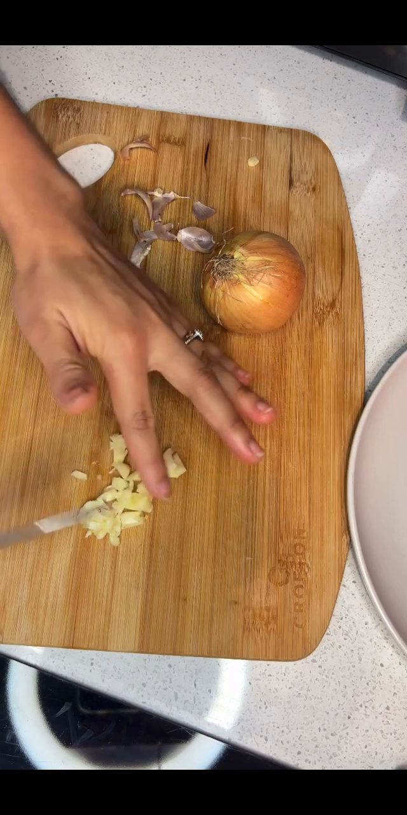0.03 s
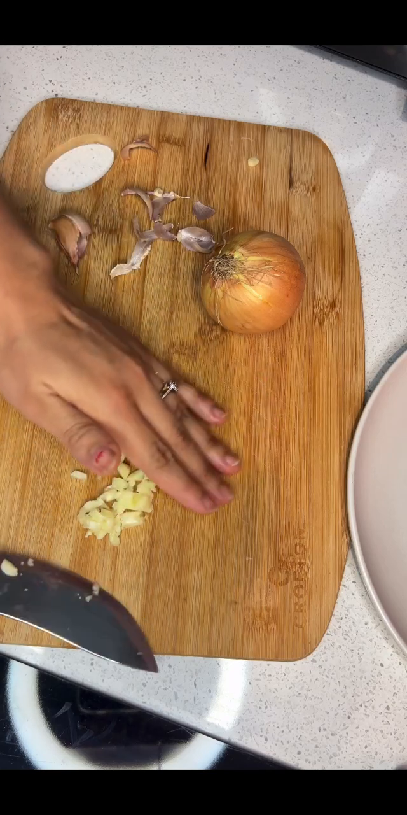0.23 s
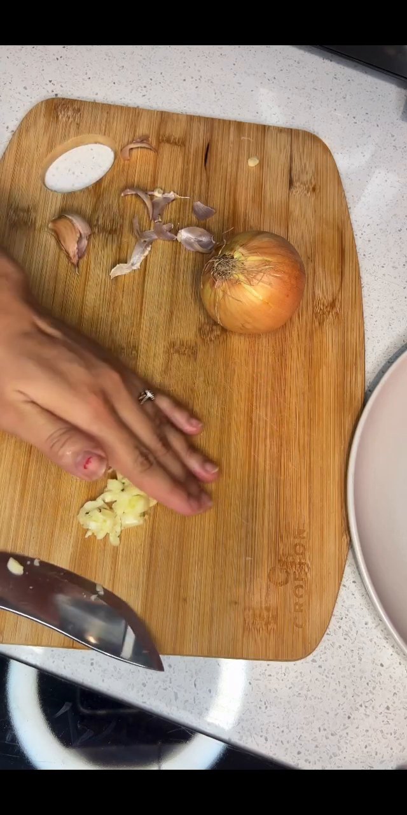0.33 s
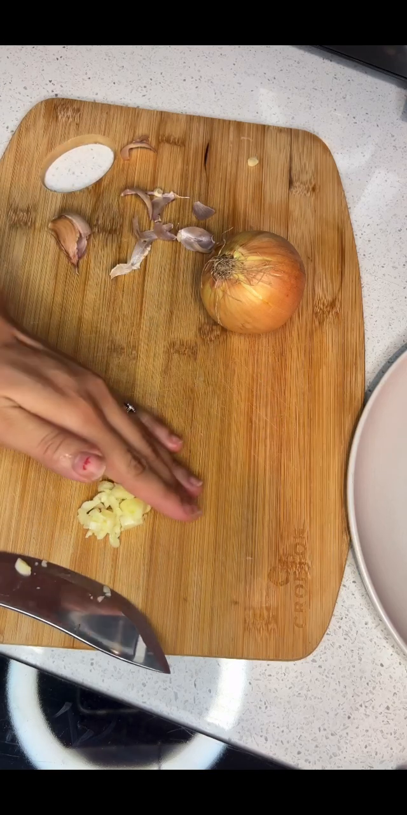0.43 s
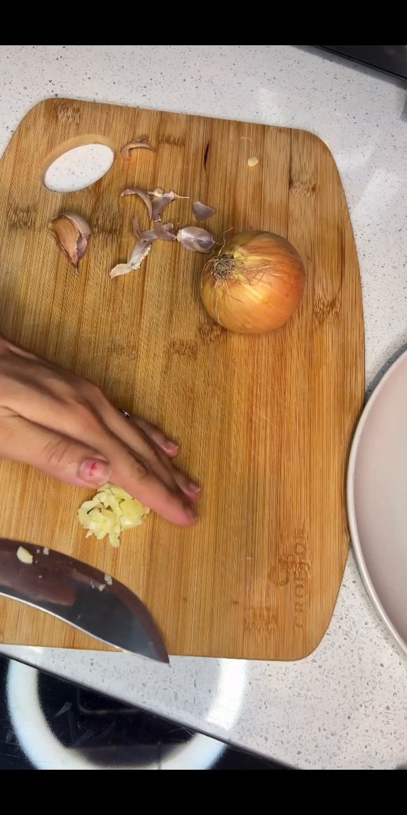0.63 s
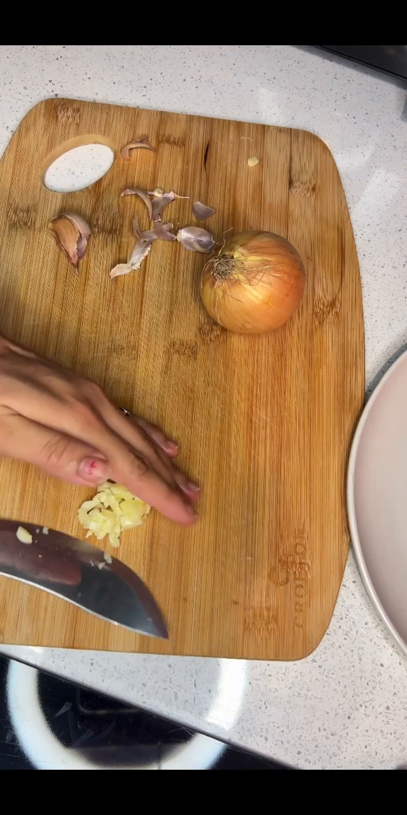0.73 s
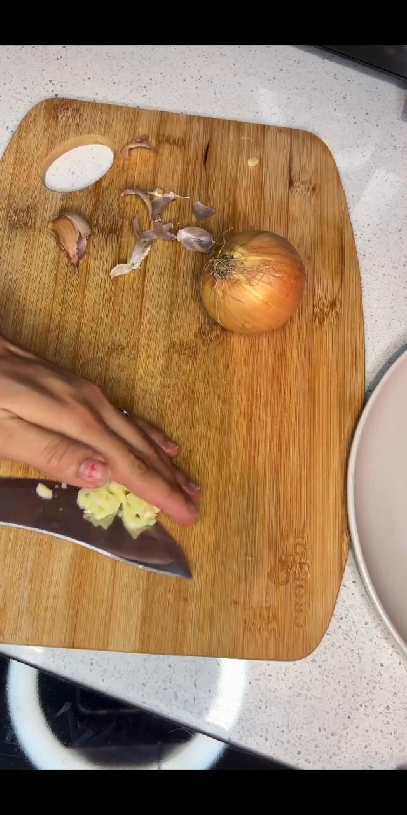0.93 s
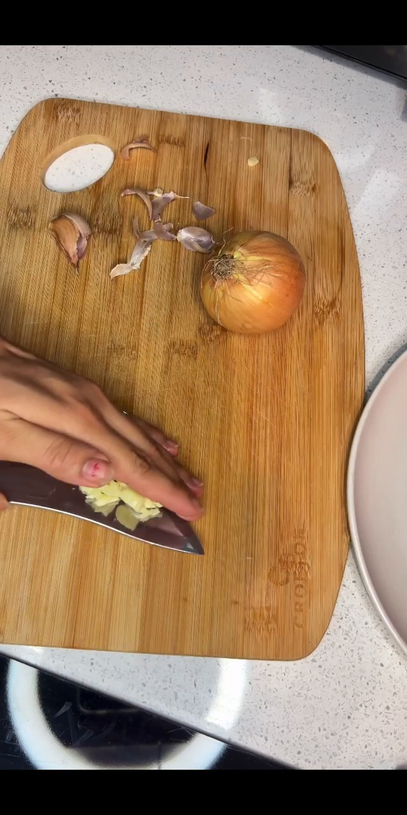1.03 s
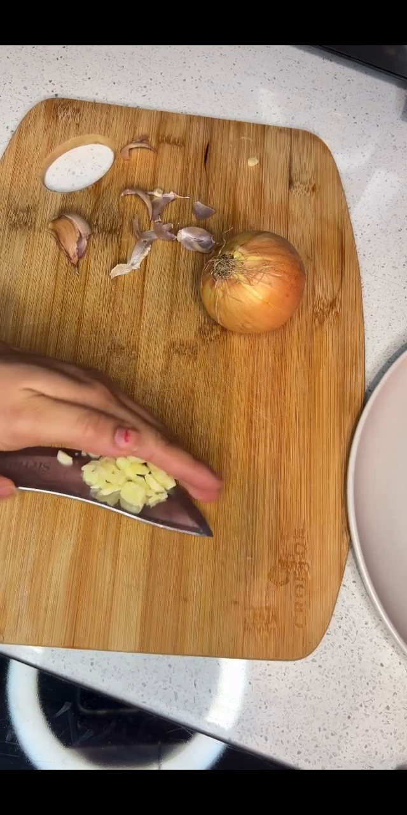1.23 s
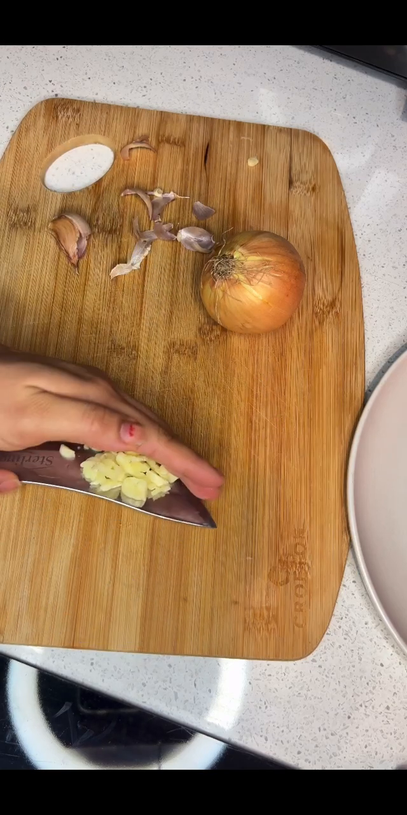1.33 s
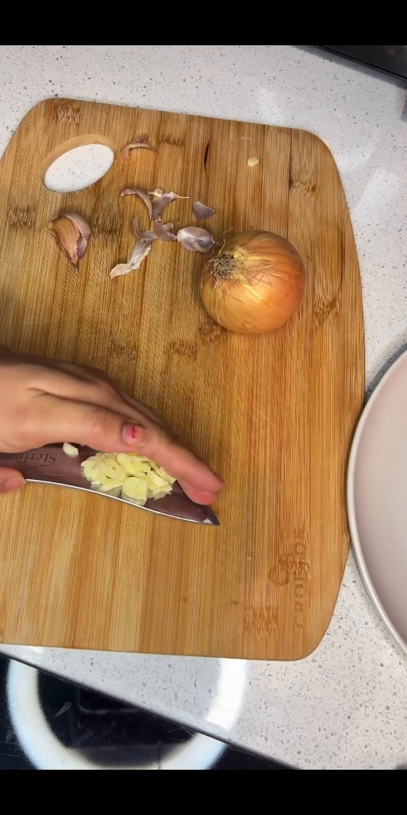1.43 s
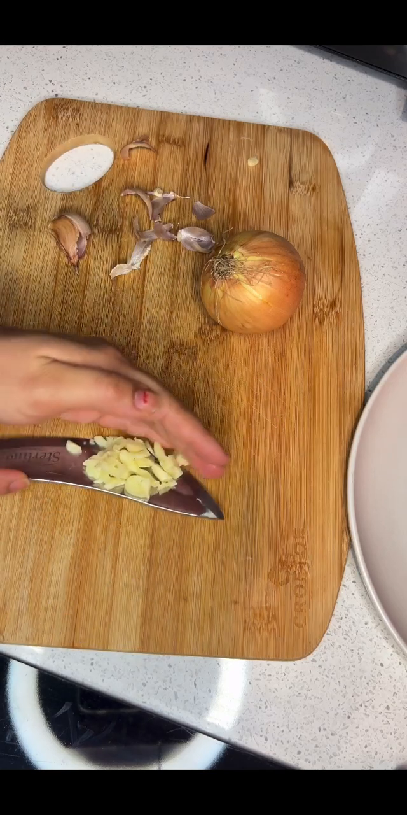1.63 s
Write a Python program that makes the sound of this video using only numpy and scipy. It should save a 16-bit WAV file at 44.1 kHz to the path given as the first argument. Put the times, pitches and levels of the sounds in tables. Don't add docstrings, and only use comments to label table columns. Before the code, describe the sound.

A knife lands on a wooden cutting board with one bright, woody knock, then a soft brush, a long rough blade scrape and a few faint strokes, in a quiet kitchen, close phone microphone in stereo.

```python
import sys
import numpy as np
from scipy import signal
from scipy.io import wavfile

SR = 44100
rng = np.random.default_rng(int(sys.argv[2]) if len(sys.argv) > 2 else 0)


def invert_db(level):
    return 10 ** (np.asarray(level, dtype=float) / 20)


def put_to_file(sound):
    columns = np.atleast_2d(sound).T
    safe = np.clip(columns, -1, 1)
    whole_steps = np.round(safe * 32767)
    wavfile.write(sys.argv[1], SR, whole_steps.astype(np.int16))


N = 74970
TIME = np.arange(N) / SR
KNOCK_S = .2418

# (frequency [Hz], left minus right [dB])
LEFT_DB = [(60, -1), (130, -2), (290, -1), (640, -7.5), (1410, 0), (3100, 0.5), (6820, 0.5), (15000, -0.5)]


def rms_one(x):
    return x / np.sqrt(np.mean(x ** 2) + 1e-20)


def at_hz(points, hz):
    table = np.array(points)
    return np.interp(np.log(hz), np.log(table[:, 0]), table[:, 1])


def drift(rate):
    hop, settle = 40, 2000
    r = np.exp(-2 * hop * np.pi * rate / SR)
    white = rng.standard_normal(N // hop + settle + 2)
    slow = signal.lfilter([1], [1, -2 * r, r * r], white)[settle:]
    return np.interp(np.arange(N) / hop, np.arange(len(slow)), rms_one(slow))


def swell(peak, rise, fall, db):
    return invert_db(db) * np.exp(-((TIME - peak) / np.where(TIME < peak, rise, fall)) ** 2)


def low_pass(x, hz):
    return signal.sosfilt(signal.cheby2(14, 60, hz, fs=SR, output="sos"), x)


def ports(mid, side, hz):
    # (frequency [Hz], left-right likeness [-1 to 1])
    likeness = [(60, 0.98), (130, 0.88), (290, 0.86), (640, -0.26), (1410, 0.89), (3100, 0.46),
                (6820, 0.36), (15000, -0.12)]
    alike = np.clip(at_hz(likeness, hz), -.99, .99)
    lean = at_hz(LEFT_DB, hz) / 2
    pair = np.sqrt(1 + alike) * mid + np.sqrt(1 - alike) * side * [[1], [-1]]
    return pair * invert_db(np.array([[lean], [-lean]]))


def bands(white, spectrum, gain):
    out, power = 0, 0
    edges = 25 * 2 ** np.arange(0, 9.4, .4)
    for k, (low, high) in enumerate(zip(edges, edges[1:])):
        hz = np.sqrt(low * high)
        if spectrum[0][0] <= hz <= 1.1 * spectrum[-1][0]:
            band = signal.butter(2, [low, high], "band", fs=SR, output="sos")
            pair = signal.sosfilt(band, white[k % 2])
            level_db = at_hz(spectrum, hz)
            out = out + invert_db(level_db) * gain(hz) * ports(*pair, hz)
            power += invert_db(2 * level_db) * (high - low) / SR * 2
    return out / np.sqrt(power)


def resonate(pair, hz, width):
    r = np.exp(-np.pi * width / SR)
    stage = [1, 0, -1, 1, -2 * r * np.cos(2 * np.pi * hz / SR), r * r]
    return ports(*rms_one(signal.sosfilt([stage, stage], pair)), hz)


def air():
    # (frequency [Hz], level [dB per Hz])
    air_colour = [(25, -16.5), (60, -4.5), (175, -14), (450, -18), (950, -24.5), (2400, -33), (3200, -43),
                  (16000, -56.5)]
    # (frequency [Hz], width [Hz], level [dB])
    air_humps = [(100, 70, -75.5), (1505, 510, -77.5), (4060, 410, -91), (7500, 850, -89.5),
                 (11350, 460, -100)]
    white = rng.standard_normal((2, 2, N + SR // 4))
    out = invert_db(-62.5) * bands(white, air_colour, lambda hz: 1)[:, -N:]
    for hz, width, db in air_humps:
        out = out + invert_db(db) * resonate(white[0, :, :N], hz, width)
    return out


def rocking():
    # (middle [s], half length [s], frequency [Hz], level [dB])
    wobbles = [(0.207, 0.022, 87, -51), (0.272, 0.016, 96.5, -21.5), (0.32, 0.022, 82, -32.5),
               (0.341, 0.032, 122, -38.5), (0.383, 0.021, 92.4, -37), (0.421, 0.031, 84.5, -39.5),
               (0.466, 0.041, 104.3, -43.5), (0.647, 0.042, 105.3, -52), (0.703, 0.062, 92.5, -48.5),
               (.75, 0.022, 98, -47), (0.847, 0.042, 100, -53.5), (0.94, 0.044, 108, -53.5),
               (1.216, 0.043, 103, -51.5), (1.263, 0.078, 94.3, -56), (1.338, .025, 100, -50),
               (1.47, 0.046, 98, -55.5), (1.559, 0.043, 103, -58), (1.602, 0.023, 100, -52.5),
               (0.694, 0.029, 230, -56), (0.856, 0.021, 255, -55.5), (0.927, 0.046, 240, -55.5),
               (.32, 0.04, 402, -51), (.36, 0.034, 373, -49), (.735, 0.035, 185, -58),
               (1.07, 0.024, 177, -59.5), (1.2, 0.026, 185, -61), (1.27, 0.024, 255, -64.5)]
    out = 0
    for middle, half, hz, db in wobbles:
        since = TIME - middle
        phase = 2 * np.pi * hz * since + rng.uniform(-0.62, 0.35)
        wave = invert_db(db) * np.exp(-2 * (since / half) ** 2 + 1j * phase)
        out = out + ports(wave.real, .5 * wave.imag, hz) / np.sqrt(2)
    return out


def graze():
    # (peak [s], rise [s], fall [s], level [dB])
    touch = (.235, .006, .006, -55)
    # (frequency [Hz], level [dB per Hz])
    touch_colour = [(900, 10), (1500, 5), (2600, 0), (4500, -15)]
    return swell(*touch) * bands(rng.standard_normal((2, 2, N)), touch_colour, lambda hz: 1)


def crack(white, age):
    # (frequency [Hz], level [dB per Hz])
    crack_colour = [(3500, -8), (5500, 1), (7300, -8), (10000, 3.5), (13300, -11), (15000, -5)]
    mid = white[:, 0]
    pair = np.stack([mid, np.roll(mid, 3, axis=1)], axis=1)
    fade = invert_db(-27.5 - 60 * np.minimum(age / .012, 2))
    return (age > 0) * fade * bands(pair, crack_colour, lambda hz: 1)


def board_ring(age):
    board_hz = [588, 744, 1065, 1165, 1447, 1536, 1956, 2185, 2380, 2574, 2810, 3440, 3670, 4110]
    # (level [dB], t60 [s], side share [0 to 1], swell [s])
    board_modes = [(-11.5, 0.06, 0.53, 0.00052), (-25, 0.064, 1, 0.003), (3, 0.033, 0.39, 0.0024),
                   (-0.5, 0.045, 0.33, 0.003), (-2.5, 0.054, .2, 0.0045), (1.5, 0.033, 0.16, 0.0009),
                   (0.5, 0.024, 0.12, 0.00082), (-5, 0.032, 0.42, 0.00081), (-6.5, 0.036, 0.84, 0.0026),
                   (-3, 0.039, 1, 0.0011), (-14, 0.022, 0.83, 0.0018), (-11, .025, 0.44, .0003),
                   (-8, 0.023, 0.23, 0.00014), (-16.5, 0.028, 0.39, 0.00019)]
    pushes = [1, -1, 1, -1, 1, 1, 1, 1, 1, 1, -1, 1, 1, 1]
    out = np.zeros((2, N))
    for hz, (db, t60, side, rise), push in zip(board_hz, board_modes, pushes):
        delay = 0.00054 if hz < 1700 else 0
        late = np.maximum(age - delay, 0)
        level = push * invert_db(-15.5 + db - 60 * late / t60) * (1 - np.exp(-late / rise))
        ring = level * np.exp(2j * np.pi * hz * late)
        lean = invert_db(at_hz(LEFT_DB, hz) / 2 * np.array([[1], [-1]]))
        out += lean * (ring.imag + side * ring.real * [[1], [-1]])
    return out


def counter_ring(age):
    # (frequency [Hz], level [dB], t60 [s], delay [s])
    counter_modes = [(187.3, -25, 0.072, 0.00544), (245.8, -41, 0.37, 0.00785),
                     (271, -14.5, 0.042, 0.00557), (393, -42.5, 0.26, 0.041), (410.3, -22, 0.051, 0.002),
                     (517.2, -34.5, 0.21, 0.00216), (2150, -11.5, 0.005, 0.000082)]
    swell_cycles = 2.07
    out = np.zeros((2, N))
    for hz, db, t60, delay in counter_modes:
        late = np.maximum(age - delay, 0)
        level = invert_db(db - 60 * late / t60) * (1 - np.exp(-late * hz / swell_cycles))
        turn = 2 * np.pi * hz * late
        out += ports(level * np.sin(turn), level * np.cos(turn), hz) / np.sqrt(2)
    return out


def room_tail(white, age):
    # (frequency [Hz], level [dB per Hz])
    tail_colour = [(150, -5), (400, -7), (800, -22), (1050, -22), (2400, -18.5), (4000, -27), (11000, -47),
                   (12500, -57)]
    # (frequency [Hz], t60 [s])
    tail_t60 = [(200, 0.7), (500, 0.86), (1200, 0.8), (6000, 0.59), (14000, 0.69)]
    # (frequency [Hz], width [Hz], level [dB], t60
    # [s])
    lingering = [(386, 36, -47, 0.88), (1070, 98, -45, 0.59), (1474, 73, -46, 0.63), (1910, 150, -64, 0.63),
                 (2597, 116, -53.5, 0.72), (10670, 300, -61, 0.37), (12700, 340, -74.5, 0.35),
                 (15000, 350, -74, 0.54)]
    wash = bands(white[::-1], tail_colour, lambda hz: invert_db(-60 * age / at_hz(tail_t60, hz)))
    tail = invert_db(-41) * wash
    for hz, width, db, t60 in lingering:
        rough_width = max(width, 80 if hz > 900 else 0)
        tail = tail + invert_db(db - 60 * age / t60) * resonate(white[0], hz, rough_width)
    return (1 - np.exp(-age / 0.00074)) * tail


def knock():
    white = rng.standard_normal((2, 2, N))
    age = np.maximum(TIME - KNOCK_S, 0)
    return crack(white, age) + board_ring(age) + counter_ring(age) + room_tail(white, age)


def fibre_slips():
    catches_per_s, spread_db, judder_db = 5000, 2.5, 1
    sizes = invert_db(spread_db * np.minimum(rng.exponential(1, (2, N)), 5.0))
    sizes = sizes * (rng.random((2, N)) < catches_per_s / SR)
    signs = rng.choice([-1, 1], (2, 2, N))
    return rms_one(sizes[:, None] * signs * invert_db(judder_db * drift(26.5)))


def scrape():
    # (peak [s], rise [s], fall [s], level [dB])
    brushes = [
        (.42, 0.12, 0.062, -59),
        (.62, 0.021, 0.025, -64),
        (0.51, 0.11, 0.092, -82),
        (1.5, 0.21, 0.15, -79),
    ]
    # (time [s], blade speed as hiss [dB], pressure [dB], contact [heel -1 to tip 1])
    scrape_path = [
        (0.669, -70.5, 3.5, -0.65),
        (.71, -60, 1.5, -0.49),
        (0.748, -53, -4, -0.81),
        (.83, -51.5, -1.5, -0.43),
        (.885, -54.5, 2.5, -0.35),
        (.94, -50, 1.5, 0.071),
        (1.021, -50, 4, 0.31),
        (1.047, -63, 8, 0.47),
        (1.122, -77, 8, 0.45),
    ]
    # (time
    # [s], half length # [s], change of wood level [dB])
    snags = [(0.728, 0.0037, 5), (0.744, 0.008, 3), (0.794, 0.0058, 3), (.844, 0.0027, -3),
             (0.867, 0.0057, 2), (0.877, 0.0025, 0), (0.931, 0.0044, 4.5), (.95, 0.0034, 1),
             (0.969, 0.0032, 8), (0.988, 0.0031, -2.5), (0.999, .006, 0.5), (1.008, 0.0016, 4),
             (1.225, .008, -3.5)]
    # (peak [s], rise [s], fall [s], hiss [dB], pressure [dB])
    strokes = [
        (1.252, 0.038, 0.036, -66, 10.5),
        (1.309, .003, 0.004, -74, 15),
        (1.085, .03, 0.02, -74.5, -15),
        (1.41, .008, .04, -69.5, -1.5),
        (1.469, 0.038, 0.034, -64.5, 1.5),
        (1.54, 0.017, 0.02, -67.5, -21.5),
    ]
    # (frequency [Hz], width [Hz], level [dB], change toward the tip [dB])
    grain = [(231, 95, -8.5, -5), (909, 120, -4, 6.5), (1115, 183, -3.5, -1.5), (1533, 430, -13, -3.5),
             (2014, 147, -5.5, -12), (2300, 187, -7.5, 1)]
    # (frequency [Hz], width [Hz], level [dB], change toward the tip [dB])
    blade = [(3196, 310, -10, 11), (4020, 280, -11, 0), (5470, 190, -18, 0), (5870, 190, -10.5, -8.5),
             (6880, 260, -8, -3.5), (9000, 350, -19, -13), (10700, 320, -5, -2.5), (10980, 300, -8.5, 6)]
    # (frequency [Hz], width [Hz], level [dB], change toward the tip [dB])
    thin_edge = [(11950, 250, -21, -3), (12650, 300, -17, -2), (13250, 250, -21, 4), (13650, 200, -23, 0),
                 (14800, 400, -14, 3), (15450, 300, -24, 3)]
    # (frequency [Hz], level [dB per Hz])
    friction_colour = [(1000, -4), (1800, 4.5), (2700, -2), (5000, -0.5), (8000, -7), (10500, -7),
                       (12000, -17), (15500, -11.5)]
    edge_hz = 11300
    sing_share = 0.48

    start, *columns = np.transpose(scrape_path)
    hiss_db, press_db, tip = (np.interp(TIME, start, column) for column in columns)
    first, last = start[0], start[-1]
    hiss = (TIME > first) * invert_db(hiss_db - 27 * np.maximum(TIME - last, 0))
    wood = hiss * invert_db(press_db)
    sing = hiss * invert_db(-sing_share * press_db)
    for peak, rise, fall, db, pressure_db in strokes:
        shape = swell(peak, rise, fall, db)
        hiss = np.hypot(hiss, shape)
        wood = np.hypot(wood, shape * invert_db(pressure_db))
        sing = np.hypot(sing, shape * invert_db(-sing_share * pressure_db))
    brush = sum(swell(*row) for row in brushes) * (TIME > KNOCK_S)
    snag_db = sum(db * np.exp(-((TIME - at) / half) ** 2) for at, half, db in snags)
    wood = wood * invert_db(snag_db)
    tip = tip * (TIME < last) * (TIME > first)
    slips = fibre_slips()

    def tones(modes):
        total = 0
        for k, (hz, width, db, toward_tip) in enumerate(modes):
            waver_db = 2.4 * drift(19) if hz < edge_hz else 5.5 * drift(6)
            level = invert_db(db + 10 * np.log10(width) + toward_tip * tip + waver_db)
            if hz > 8000:
                level = level * (sing / (hiss + 1e-12))
            total = total + level * resonate(slips[k % 2], hz, width)
        return rms_one(total)

    def rub_level(hz):
        soft = brush * invert_db(-8 * (hz < 3500))
        hard = wood if hz < 2800 else hiss * (hz < edge_hz)
        return invert_db(2.05 * drift(18)) * np.hypot(soft, hard)

    rub = low_pass(bands(slips[::-1], friction_colour, rub_level), 1.3 * edge_hz)
    wood_ring = invert_db(-2) * wood * tones(grain)
    steel_ring = invert_db(-1.5) * hiss * tones([*blade, *thin_edge])
    return wood_ring + steel_ring + invert_db(-5) * rub


def squeal():
    # (start [s], end [s], fade [s], frequency [Hz], level [dB], flutter [dB])
    heel_squeal = (.735, .845, .012, 5556, -57.5, 2.0)
    start, end, fade, hz, db, flutter_db = heel_squeal
    gate = np.clip(np.minimum(TIME - start, end - TIME) / fade + .5, 0, 1) ** 2
    pitch = hz + 14.1 * drift(26.0)
    level = gate * invert_db(db + flutter_db * drift(33.0))
    wave = level * np.exp(2j * np.pi * np.cumsum(pitch) / SR)
    return ports(wave.real, wave.imag, hz)


def scene():
    return air() + rocking() + graze() + knock() + scrape() + squeal()


def roll_off(x):
    return signal.sosfilt(signal.butter(12, 16430, fs=SR, output="sos"), x)


def record(dry):
    mix = low_pass(dry, 16350)
    return roll_off(mix)


dry = scene()
out = record(dry)
put_to_file(out)
```